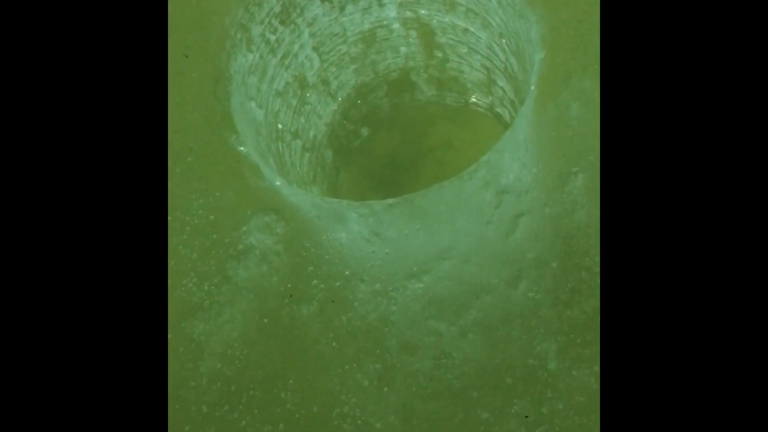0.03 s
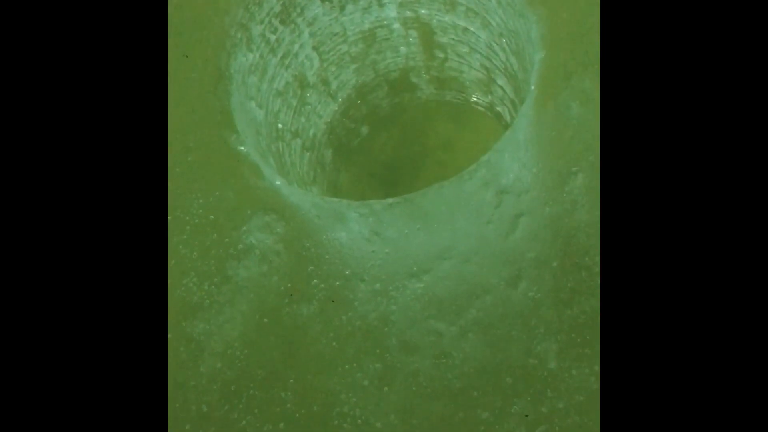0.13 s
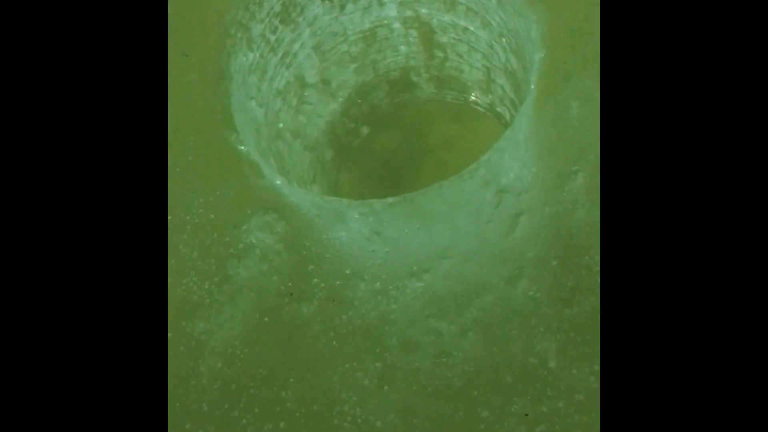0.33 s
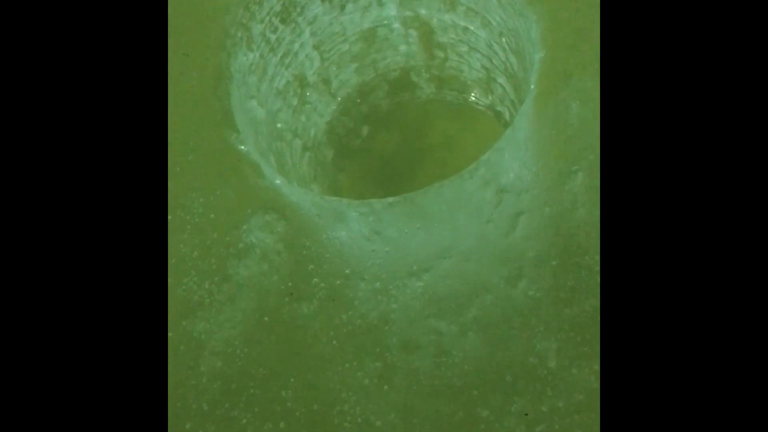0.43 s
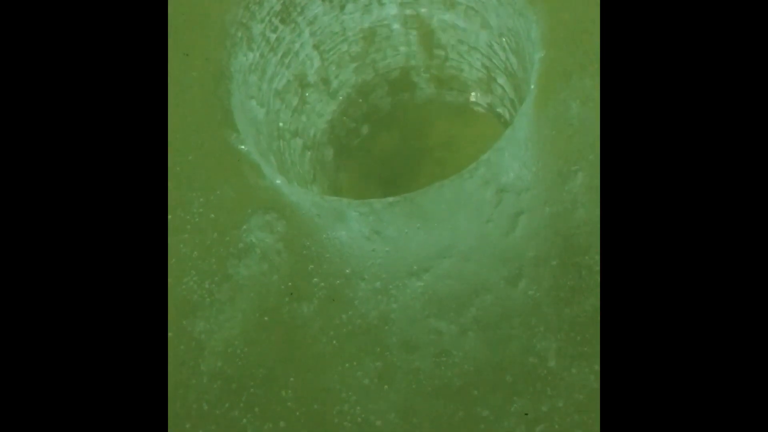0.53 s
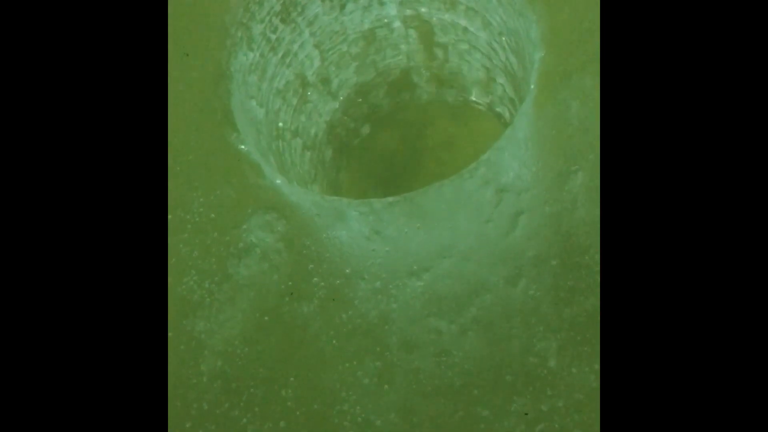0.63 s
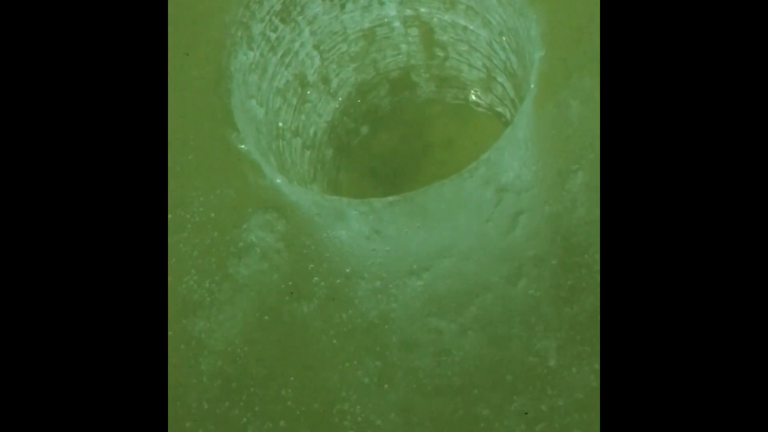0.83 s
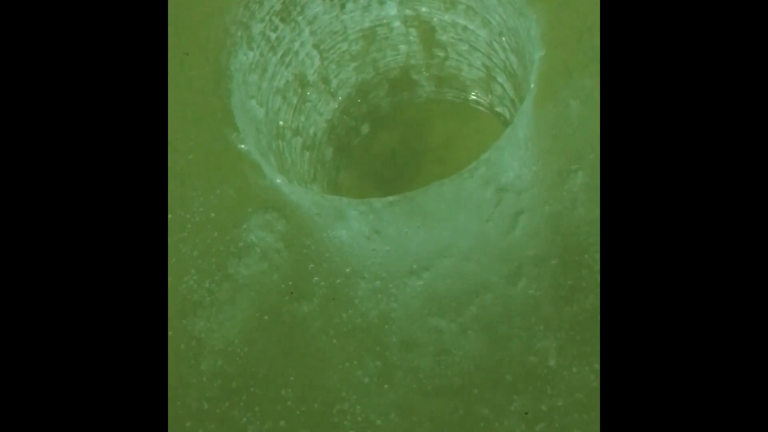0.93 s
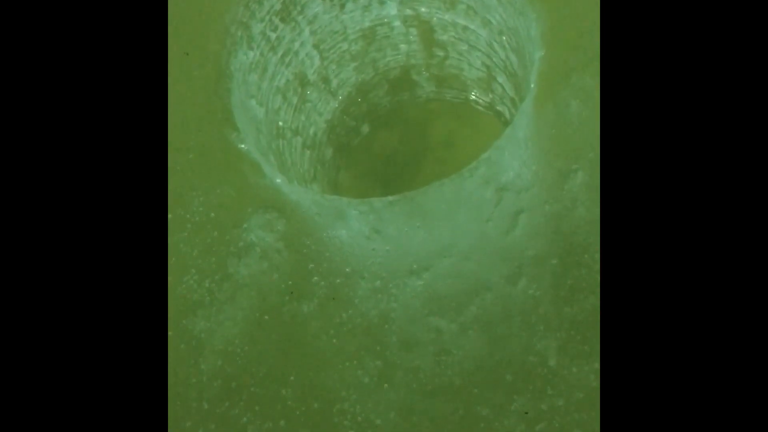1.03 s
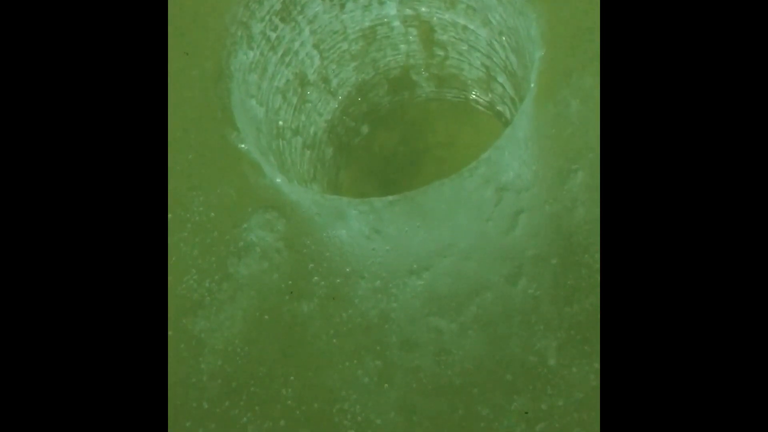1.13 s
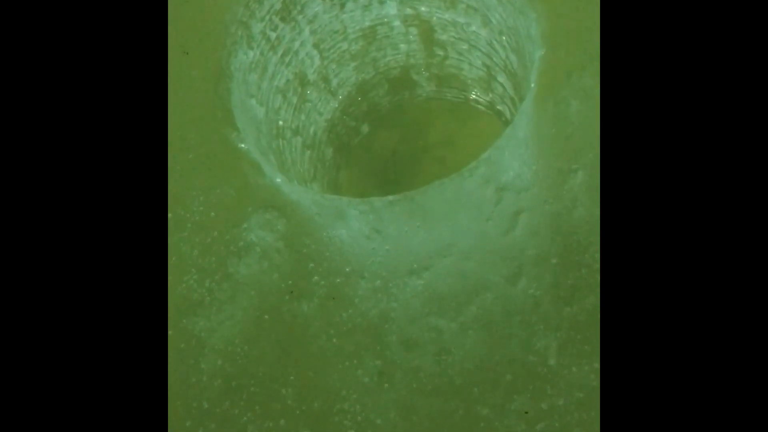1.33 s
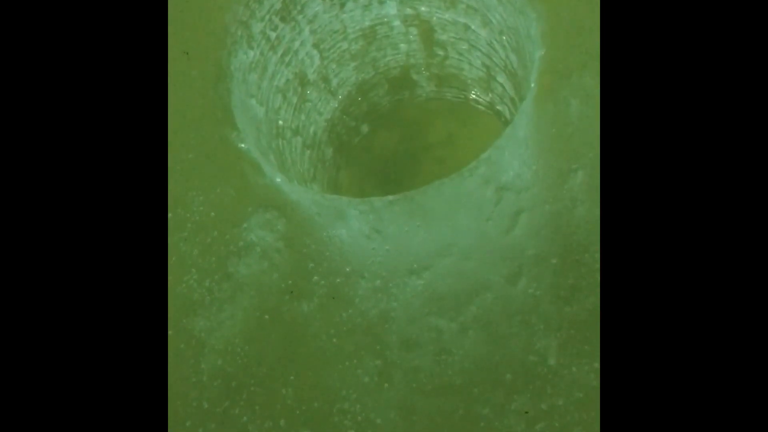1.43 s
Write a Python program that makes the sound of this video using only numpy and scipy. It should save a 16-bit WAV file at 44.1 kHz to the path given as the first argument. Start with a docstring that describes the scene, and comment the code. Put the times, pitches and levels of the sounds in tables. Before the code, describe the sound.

Ice scrapes and crunches beside an ice hole, then small metal gear clinks faintly.

```python
"""Scrape and crunch beside an ice hole

Ice grains fracture in a gritty scrape, then in a crunch with a hollow knock and a low thud at its loudest,
both damped resonances of the ice. Loose bits tap after each, and two faint watery notes follow.
A small piece of metal gear clinks six times, each impact exciting its modes.
Near surfaces reflect a short tail from the ice; faint outdoor noise lies below."""
import sys
import numpy as np
from scipy import signal
from scipy.fft import rfft, irfft
from scipy.io import wavfile
from scipy.ndimage import uniform_filter1d

SR = 44100
rng = np.random.default_rng(int(sys.argv[2]) if len(sys.argv) > 2 else 0)


def wrap_up_sound(samples):
    """Save the sound to the file named by the first command line argument, as 16-bit audio."""
    columns = np.atleast_2d(samples).T
    # keep every value between -1 and 1, then stretch to whole-number steps
    tamed = np.clip(columns, -1, 1)
    steps = np.round(tamed * 32767).astype(np.int16)
    wavfile.write(sys.argv[1], SR, steps)


N = 66150
TIME = np.arange(N) / SR

# Envelopes of the noisy sounds. Each row: time in seconds, level in dB.
AIR_LEVEL = [(0, -65), (.3, -67), (.6, -61.5), (.92, -64.5), (1.1, -68.5), (1.3, -72.5), (1.5, -71.5)]
EARLY_BRUSH_LEVEL = [(.08, -92), (.098, -65), (.115, -55.5), (.15, -77)]
SCRAPE_LEVEL = [(.17, -83), (.226, -60.5), (.241, -42.5), (.247, -32.5), (.275, -36), (.312, -38.5),
                (.345, -46.5), (.40, -61), (.44, -54.5)]
SPRAY_LEVEL = [(.228, -67), (.251, -39.5), (.275, -50.5), (.32, -74)]
CRUNCH_LEVEL = [(.436, -65.5), (.448, -44), (.454, -46.5), (.4575, -30), (.468, -32), (.481, -37),
                (.50, -44), (.53, -57), (.57, -62.5)]
COLLAPSE_LEVEL = [(.452, -63), (.458, -30), (.474, -34.5), (.488, -51), (.51, -79.5)]
LATE_BRUSH_LEVEL = [(.97, -80), (1.04, -71), (1.13, -86)]
# Spectra of the noisy sounds. Each row: frequency in Hz, relative spectral density in dB.
AIR_SPECTRUM = [(100, -5.5), (350, -2), (700, -5), (1400, -8.5), (2600, -12.5), (6000, -15.5),
                (10000, -20.5), (16000, -20)]
RUMBLE_SPECTRUM = [(20, -34.5), (40, 1), (60, -0.5), (90, -4.5), (150, -14.5), (400, -24.5), (2000, -81.5)]
BRUSH_SPECTRUM = [(100, -23), (1200, 6), (2500, -3.5), (4500, 2), (7000, 3.5), (10500, -10), (14000, -4),
                  (16000, -2.5)]
SCRAPE_SPECTRUM = [(40, -33.5), (150, -10), (230, -3.5), (700, -6), (1100, -1.5), (1700, -3.5),
                   (2100, -8.5), (3500, -6.5), (8000, -13), (12000, -19.5), (16000, -19)]
SPRAY_SPECTRUM = [(3000, -26.5), (8000, -21), (11500, 17), (16000, 5.5)]
CRUNCH_SPECTRUM = [(40, -15.5), (130, -12), (500, -9.5), (750, -3), (1100, -2), (1900, -8), (2500, -9.5),
                   (4600, -13), (6000, -9), (8000, -20), (11000, -16), (16000, -24.5)]
TICK_SPECTRUM = [(2000, -27.5), (7000, -4.5), (10500, -6), (13500, 2), (16000, 1)]
COLLAPSE_SPECTRUM = [(40, -10), (120, -2.5), (330, -1), (500, -3), (720, -6.5), (1200, -19), (4000, -41)]
CLINK_SPECTRUM = [(400, -16), (1300, -17), (2100, -7), (3500, -3), (4800, -8), (6100, 3), (7800, -6.5),
                  (9000, 2.5), (10700, -8.5), (13000, 3.5), (16000, -7.5)]
# Resonances of the ice. Each row: frequency in Hz, bandwidth in Hz, gain in dB.
SCRAPE_MODES = [(305, 48, -1), (439, 150, -10), (557, 38.6, 4), (958, 95, -1.5), (1425, 33, 1.5),
                (1660, 27, 3), (2534, 48, -5)]
CRUNCH_MODES = [(1008, 86, -2.5), (1125, 34, -9), (2334, 48, 1), (2406, 51.1, -6.5)]
# Damped notes. Each row: start in seconds, peak level in dB, frequency in Hz, rise time in seconds.
ICE_KNOCKS = [(.2432, -27.5, 1150, .001), (.2478, -29, 1050, .0012), (.2510, -31, 405, 0.0041),
              (.3325, -33.5, 650, .0009), (.3712, -39, 1200, .0015), (.3895, -37.5, 1250, .001),
              (.4612, -15.5, 1050, .0016), (.4775, -24.5, 950, .0014), (.5335, -41, 520, .0012),
              (.5542, -44.5, 2000, .0008)]
SHEET_THUDS = [(.262, -46.5, 92, 0.0077), (.345, -52, 60, 0.012), (.468, -30.5, 69.1, 0.0082)]
WATER_PLOPS = [(.618, -63, 713, 0.013), (.650, -61.5, 407, 0.011)]
# Tiny contacts. Each row: start in seconds, level in dB.
FAINT_TICKS = [(.4470, -59), (.5545, -59), (0.73, -60), (1.073, -62), (1.101, -60.5), (1.146, -61)]
# Metal impacts. Each row: start in seconds, contact gain in dB, ring gain in dB, tilt in dB per octave.
GEAR_CLINKS = [(0.6995, -44.5, -59.5, -.3), (0.8336, -45, -56.5, -0.2), (.8620, -46, -59, -0.2),
               (0.8881, -43, -58, 1.1), (0.9189, -42, -65.5, 0.7), (1.2772, -46, -57, -1)]
# Contacts within a clink. Each row: offset in seconds, relative level in dB.
CLINK_CHATTER = [(-.0025, -6), (0, 0.5), (.003, -1.5)]
# Modes of the metal piece. Each entry: frequency in Hz.
METAL_MODE_HZ = [6105, 7018, 7108, 9378, 9408, 12040, 12900, 13950]
# Ringing of those modes. Each row: relative level in dB, time to fall 60 dB in seconds.
METAL_MODE_DECAYS = [(-1, 0.18), (3.5, 0.29), (-2.5, 0.23), (-1, 0.78), (-3, 0.27), (-27, .1), (-15, 0.15),
                     (1, 0.14)]
# Notes of a second part of the gear. Each row: start in seconds, level in dB, frequency in Hz.
GEAR_PINGS = [(0.7014, -57.5, 2520), (.8335, -59.5, 3520), (0.8882, -62, 2490)]


def from_db(db):
    """Amplitude grows tenfold for every 20 dB."""
    return 10 ** (np.asarray(db) / 20)


def unit_power(x):
    """Division by the RMS value gives unit power."""
    return x / np.sqrt(np.mean(x ** 2) + 1e-20)


def coloured(x, spectrum):
    """Filtering multiplies spectra; the result is scaled to unit power."""
    hz, db = np.transpose(spectrum)
    bin_hz = np.fft.rfftfreq(N, 1 / SR) + 1
    gain = from_db(np.interp(np.log(bin_hz), np.log(hz), db))
    return unit_power(irfft(rfft(x) * gain, N))


def noise(spectrum):
    """White noise takes on the spectrum of its filter."""
    return coloured(rng.standard_normal(N), spectrum)


def decay(start, t60_s):
    """Exponential decay: a sudden onset, then a fall of 60 dB in each t60_s."""
    return (TIME >= start) * from_db(-60 * np.maximum(TIME - start, 0) / t60_s)


def resonate(x, hz, width_hz):
    """A two-pole resonator passes a band about its natural frequency, with unit peak gain."""
    radius = np.exp(-np.pi * width_hz / SR)
    feedback = [1, -2 * radius * np.cos(2 * np.pi * hz / SR), radius ** 2]
    return signal.lfilter(np.array([1, 0, -1]) * (1 - radius ** 2) / 2, feedback, x)


def damped_notes(rows, sharpness):
    """Heavily damped oscillations swell and die quickly; greater sharpness narrows the pulse."""
    out = np.zeros(N)
    for start, db, hz, rise in rows:
        age = np.maximum(TIME - start, 0)
        envelope = (age / rise * np.exp(1 - age / rise)) ** sharpness
        out += from_db(db) * envelope * np.sin(2 * np.pi * hz * age)
    return out


def outdoors():
    """Broadband background noise: a soft hiss swells and fades over a steady rumble."""
    hiss = from_db(np.interp(TIME, *np.transpose(AIR_LEVEL))) * noise(AIR_SPECTRUM)
    return hiss + from_db(-64.5) * noise(RUMBLE_SPECTRUM)


def breaking_grains(levels, spectrum, modes=(), grains_per_s=3300, powder_gain=.45):
    """Brittle fracture: crystals snap at random over a hiss of powder, exciting any modes given."""
    snaps = rng.choice([-1, 1], N) * (rng.random(N) < grains_per_s / SR)
    powder = powder_gain * rng.standard_normal(N)
    grit = coloured(unit_power(snaps) + powder, spectrum)
    ringing = sum(from_db(db) * resonate(grit, hz, width) for hz, width, db in modes)
    force = from_db(np.interp(TIME, *np.transpose(levels), left=-140, right=-140))
    return force * unit_power(grit + ringing)


def brushes():
    """Light friction on the ice, once before the scrape and once after the fifth clink."""
    early = breaking_grains(EARLY_BRUSH_LEVEL, BRUSH_SPECTRUM)
    return early + breaking_grains(LATE_BRUSH_LEVEL, BRUSH_SPECTRUM)


def near_surfaces(x, gain_db=-14, low_cut_hz=630):
    """Diffuse reflection returns a short tail without bass."""
    response = rng.standard_normal(N) * decay(0.0015, t60_s=.12)
    response = signal.sosfilt(signal.butter(2, low_cut_hz, "high", fs=SR, output="sos"), response)
    return from_db(gain_db) * signal.fftconvolve(x, response / np.linalg.norm(response))[:N]


def scrape():
    """Forced vibration: breaking grains drive the ice's modes under a bright spray of chips."""
    grit = breaking_grains(SCRAPE_LEVEL, SCRAPE_SPECTRUM, SCRAPE_MODES)
    return grit + breaking_grains(SPRAY_LEVEL, SPRAY_SPECTRUM)


def knocks():
    """Impacts excite hollow, heavily damped resonances of the ice."""
    return damped_notes(ICE_KNOCKS, sharpness=2.7)


def thuds():
    """Weight landing on the ice sheet sets off a brief low-frequency vibration."""
    return damped_notes(SHEET_THUDS, sharpness=1.3)


def crunch():
    """A burst of fracture excites resonances, with a dull collapse as the ice gives way."""
    grit = breaking_grains(CRUNCH_LEVEL, CRUNCH_SPECTRUM, CRUNCH_MODES)
    return grit + breaking_grains(COLLAPSE_LEVEL, COLLAPSE_SPECTRUM)


def ticks():
    """Brief contacts without resonance give bright, broadband transients."""
    envelope = sum(from_db(db) * decay(start, t60_s=.014) for start, db in FAINT_TICKS)
    return envelope * noise(TICK_SPECTRUM)


def plops():
    """Damped oscillations with a gentle onset sound as faint watery notes."""
    return damped_notes(WATER_PLOPS, sharpness=1)


def metal_ring(start, strike_spread_db=1.5, flutter_depth=.26, damped_after_s=.084):
    """Free vibration: each mode decays at its own rate, and their fluttering sum is soon damped."""
    modes = np.zeros(N)
    for hz, (db, t60_s) in zip(METAL_MODE_HZ, METAL_MODE_DECAYS):
        strength = from_db(db + strike_spread_db * rng.standard_normal())
        modes += strength * decay(start, t60_s) * np.sin(2 * np.pi * (hz * TIME + rng.random()))
    flutter = 1 + flutter_depth * unit_power(uniform_filter1d(rng.standard_normal(N), size=250))
    damping = np.exp(-((TIME - start) / damped_after_s) ** 4)
    return modes * flutter * damping


def clinks(contact_t60_s=.014, choke_t60_s=.04):
    """Impact excitation: each clink chatters, chokes the earlier ringing and starts the modes anew."""
    contacts, rings = np.zeros(N), np.zeros(N)
    for start, contact_db, ring_db, tilt in GEAR_CLINKS:
        chatter = sum(from_db(db) * decay(start + offset, contact_t60_s) for offset, db in CLINK_CHATTER)
        diffuse_tail = from_db(-7) * decay(start, t60_s=.18)
        envelope = np.hypot(chatter, diffuse_tail)  # incoherent sounds add in power
        spectrum = [(hz, db + tilt * np.log2(hz)) for hz, db in CLINK_SPECTRUM]
        contacts += from_db(contact_db) * envelope * noise(spectrum)
        rings *= (TIME < start) + decay(start, choke_t60_s)
        rings += from_db(ring_db) * metal_ring(start)
    return contacts + rings


def pings():
    """A second part of the gear vibrates in one lower mode at a time, with three of the clinks."""
    return sum(from_db(db) * decay(start, t60_s=.13) * np.sin(2 * np.pi * hz * (TIME - start))
               for start, db, hz in GEAR_PINGS)


def scene():
    """Superposition: background, ice, water and gear add at one point."""
    ice = brushes() + scrape() + knocks() + crunch()
    gear = clinks() + pings()
    return (outdoors() + ice + near_surfaces(ice) + thuds() + ticks() + plops() + gear)[None]


def record(dry, low_cut_hz=38, high_cut_hz=15750):
    """Band limiting rolls off the deepest bass and cuts the top steeply."""
    dry = signal.sosfilt(signal.butter(2, low_cut_hz, "high", fs=SR, output="sos"), dry)
    return signal.sosfilt(signal.ellip(12, .2, 80, high_cut_hz, fs=SR, output="sos"), dry)


dry = scene()
out = record(dry)
wrap_up_sound(out)
```